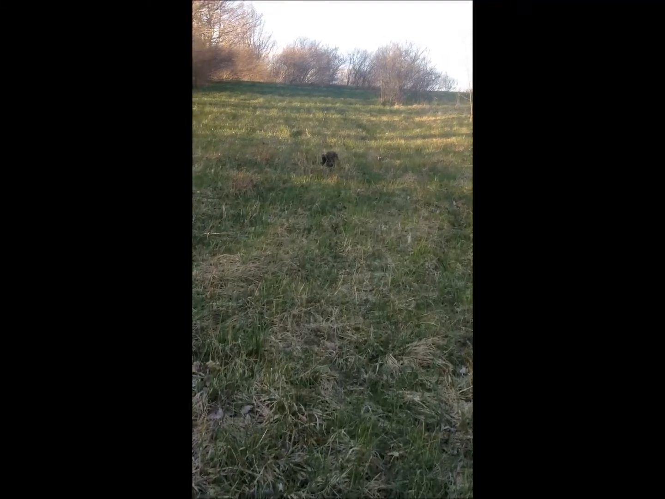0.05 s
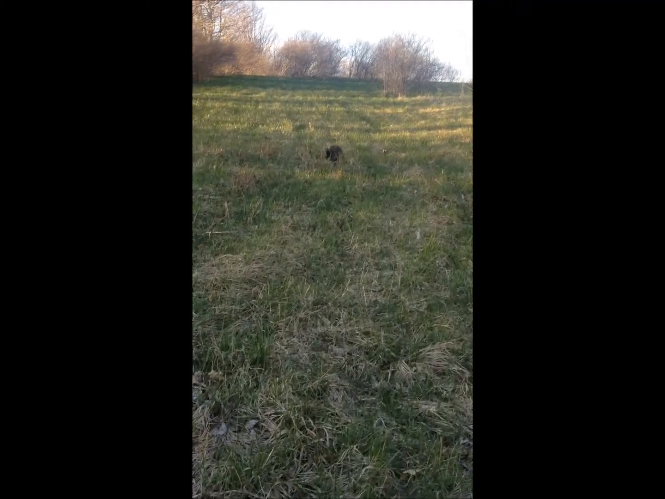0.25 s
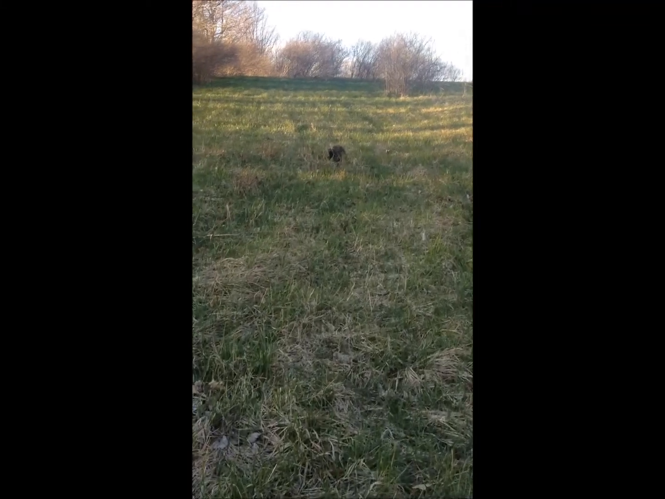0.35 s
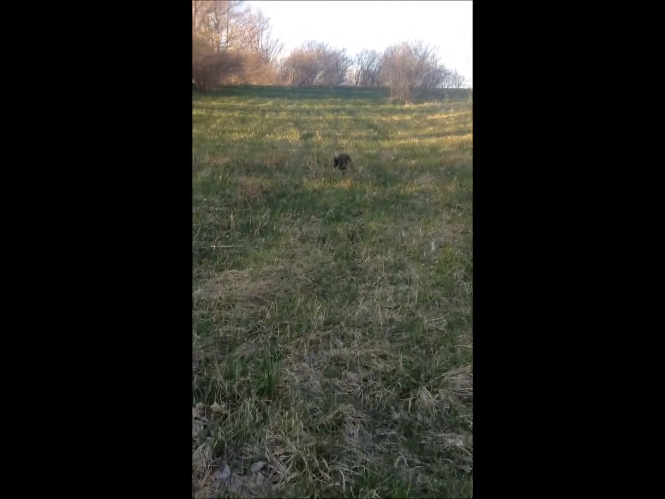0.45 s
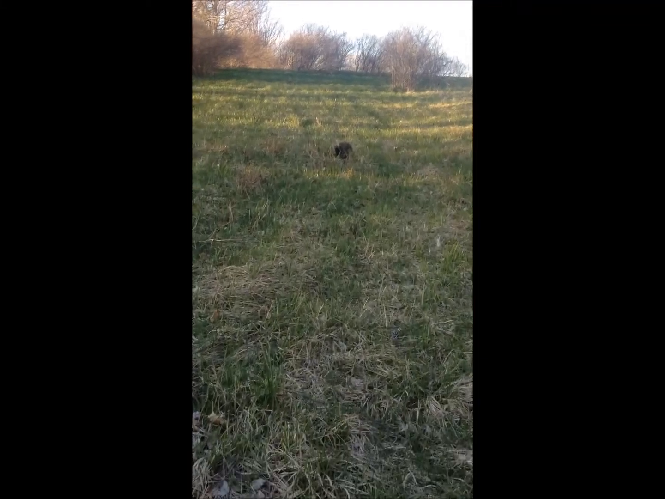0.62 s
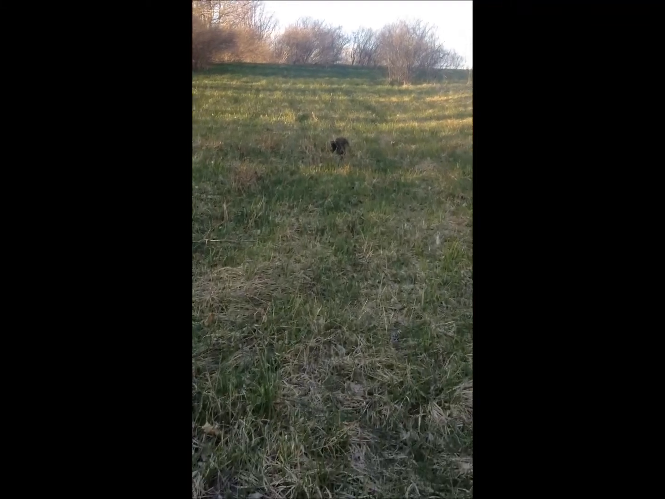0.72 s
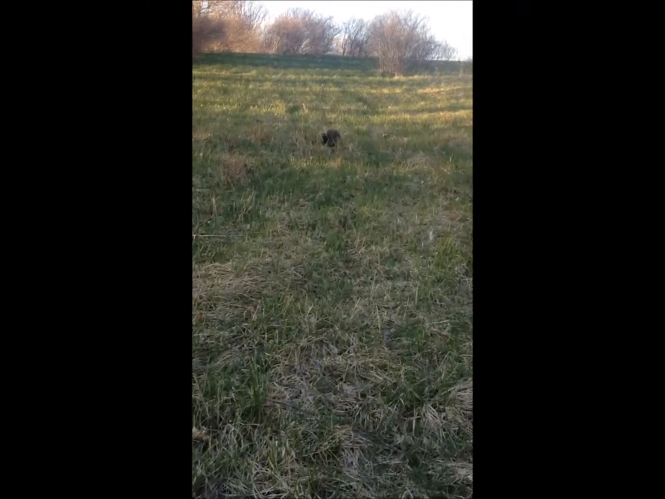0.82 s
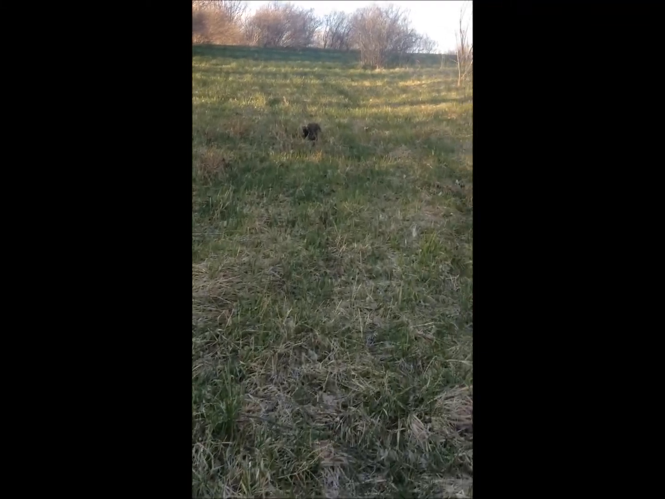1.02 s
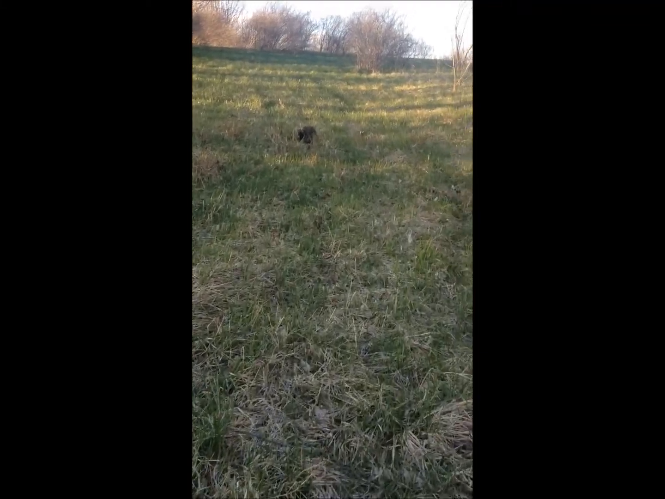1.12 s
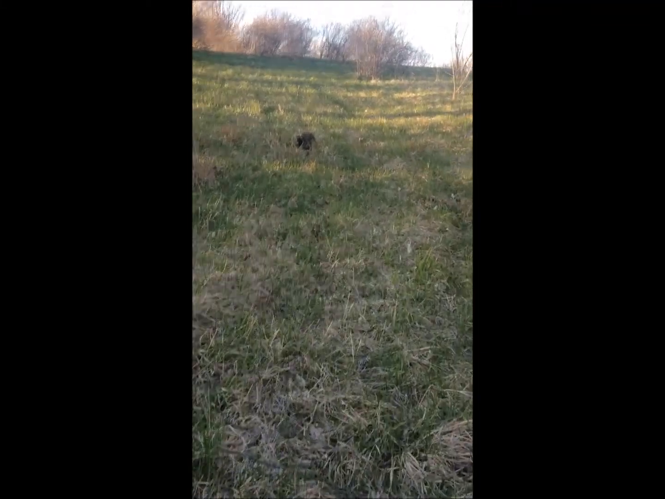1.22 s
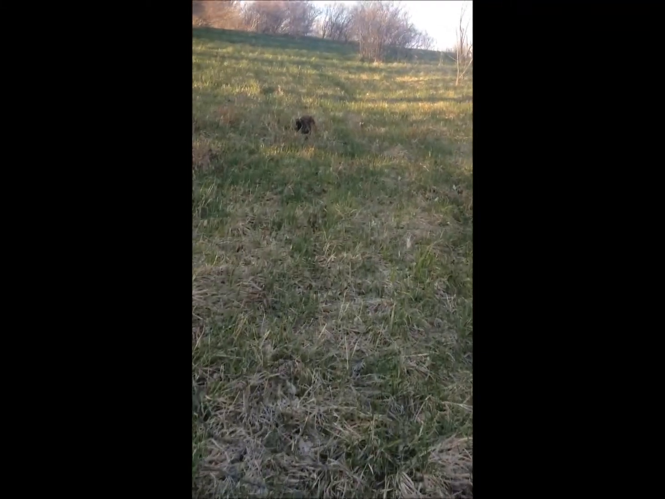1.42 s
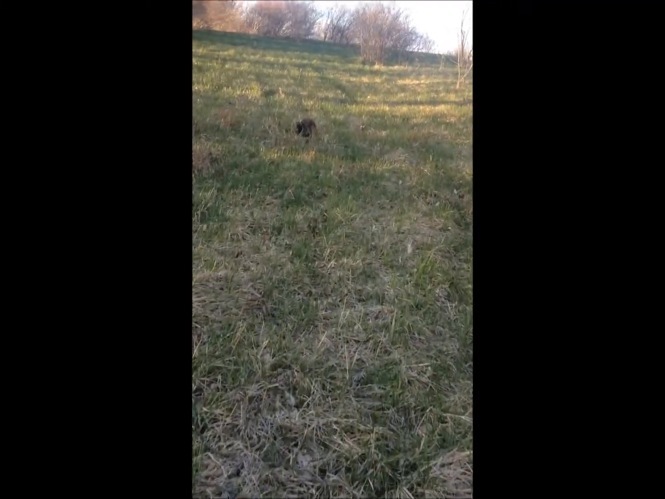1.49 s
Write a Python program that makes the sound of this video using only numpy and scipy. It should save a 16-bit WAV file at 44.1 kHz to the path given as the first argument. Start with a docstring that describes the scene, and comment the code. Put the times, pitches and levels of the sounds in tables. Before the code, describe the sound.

Dry meadow grass rustling and crunching close by under two footsteps, with stalks snapping, outdoors

```python
"""Dry, matted meadow grass rustles close by under two footsteps, in the open air.
Swish, crackle and low crunch are dense runs of tiny random clicks, with small straws and splinters popping.
Single stalks snap, each a short burst of breaking fibres with a thump, a knock, a crack and a tick.
The shoe bumps softly on the turf as short, dull thuds.
A faint, even outdoor hiss of filtered noise lies behind it all."""
import sys
import numpy as np
from scipy import signal
from scipy.fft import rfft, irfft, next_fast_len
from scipy.io import wavfile
from scipy.ndimage import uniform_filter1d

SR = 44100
rng = np.random.default_rng(int(sys.argv[2]) if len(sys.argv) > 2 else 0)


def file_out(sig):
    """Save sig as 16-bit WAV at sys.argv[1]."""
    # one column per channel
    cols = np.atleast_2d(sig).T
    # limit, then scale
    lim = np.clip(cols, -1, 1)
    pcm = np.round(lim * 32767).astype(np.int16)
    wavfile.write(sys.argv[1], SR, pcm)


N = 68355  # length in samples

# Tone of the open-air hiss: pitch_hz, strength_db
AIR_TONE = [(15, -44), (25, -57), (79, -27.5), (176, 10), (373, -1), (729, 0.5), (1060, -4.5), (2500, -2.5),
            (3540, -10), (7680, -12), (15000, -34)]
# Soft bumps of the shoe on the turf: start_s, pitch_hz, level_db, ring_s
SHOE_BUMPS = [(.096, 302, -52, .0025), (0.609, 240, -51.5, .0018), (1.0428, 197, -38, 0.002),
              (1.059, 420, -38, 0.0025), (1.0742, 305, -39, 0.0016), (1.085, 300, -39.5, 0.0018),
              (1.1002, 287, -40.5, 0.00055), (1.108, 310, -47.5, 0.0015), (1.18, 227, -46.5, 0.0032),
              (1.32, 355, -48, 0.00079), (1.327, 168, -52, 0.0059), (1.506, 317, -47.5, 0.0012)]
# Snapping stalks: start_s, fracture_ms, knock_pitch_hz, crack_pitch_hz,
# thump_level_db, knock_level_db, crack_level_db, tick_level_db
STALK_SNAPS = [(0.048, 0.33, 1510, 3360, -86, -50, -68, -52), (0.072, 0.3, 1420, 2640, -77, -62, -52, -54),
               (0.0924, 1.9, 1730, 3000, -50.5, -50, -52, -49),
               (0.1979, 0.4, 1570, 2150, -57, -54, -45.5, -69),
               (0.224, 1.4, 1210, 3570, -63, -72, -44.5, -55),
               (0.3291, 4.6, 1390, 2790, -46, -41, -38.5, -39.5),
               (0.337, 2.5, 1520, 3240, -73, -40, -42, -50),
               (0.3463, 2.2, 1420, 2280, -48, -45, -52, -46.5), (0.362, 1, 2060, 2280, -54, -47, -49, -60),
               (0.3705, 0.3, 560, 1660, -58, -37, -45, -65), (0.3977, 0.92, 1470, 2200, -69, -41, -63, -62),
               (0.403, 1.3, 1160, 1800, -42, -38, -44, -64), (0.4333, 1.4, 1010, 3000, -65, -51, -38, -41),
               (0.4359, 2.3, 920, 3400, -43.5, -38, -33, -31),
               (0.4799, 1.04, 1180, 3000, -35.5, -34.5, -24, -34),
               (0.5541, 0.66, 900, 3050, -43.5, -35, -42, -52),
               (0.5592, 1.2, 905, 2850, -52, -43.5, -51, -60),
               (0.607, 1.6, 1060, 3300, -50, -63, -64, -45.5),
               (0.693, 0.9, 970, 1980, -65, -46.5, -54, -50), (0.7002, 0.59, 790, 2700, -62, -47, -55, -64),
               (0.729, 0.39, 1200, 2500, -74, -50, -54.5, -53.5),
               (0.883, 0.21, 1170, 1200, -49, -44.5, -48.5, -68),
               (1.0296, 0.44, 870, 2340, -59, -46.5, -44.5, -39.5),
               (1.0356, 0.75, 860, 2560, -65, -40.5, -44.5, -53),
               (1.0492, 0.52, 1270, 3270, -62, -59, -44, -36.5),
               (1.0585, 4.1, 1420, 2140, -65, -37.5, -40, -34),
               (1.0606, 3.4, 980, 1540, -55, -32.5, -43, -54),
               (1.0772, 3.1, 1300, 2600, -61, -41, -41.5, -41),
               (1.096, 1.5, 1000, 3000, -63, -43, -43.5, -56),
               (1.1048, 1.6, 1300, 3000, -68, -47, -36, -33), (1.182, 1.1, 1090, 2700, -62, -50, -47, -60),
               (1.202, 0.4, 1300, 3260, -73, -47.5, -43, -51),
               (1.2324, 0.43, 1100, 2530, -75, -43, -48, -48),
               (1.242, 1.1, 1100, 2400, -79, -48.5, -56, -48),
               (1.2686, 0.1, 2000, 3730, -69, -51.5, -40, -43)]
# Resonances of a cracking stalk: pitch_ratio (times the crack pitch), strength_db
STALK_RESONANCES = [(.04, -62), (.45, -16), (.72, -12), (.85, -2), (1, 3), (1.2, -11), (1.45, 5),
                    (1.68, -8), (4.5, -36)]
# Rustle of the grass as it rises and falls, before flutter and pops:
# time_s, swish_level_db, crackle_level_db, crunch_level_db
RUSTLE_LEVELS = [(0, -52.5, -52.5, -58), (.06, -58.5, -61, -64), (.11, -61.5, -60.5, -56.5),
                 (0.15, -61.5, -67.5, -59), (0.205, -59.5, -47, -52.5), (.235, -56, -47.5, -48.5),
                 (.29, -56.5, -54.5, -50), (.335, -55, -45.5, -45), (.385, -62, -50.5, -45),
                 (.445, -53, -47, -53), (.47, -54.5, -54, -49), (.5, -52.5, -48.5, -58.5),
                 (.545, -46, -43, -50.5), (.58, -49.5, -49, -52), (.66, -52, -51.5, -57),
                 (.73, -54, -55, -53.5), (0.801, -56, -50.5, -60.5), (.835, -63.5, -63.5, -61),
                 (.875, -58, -56, -57), (.92, -63.5, -62.5, -57.5), (1.028, -59.5, -57, -58.5),
                 (1.03, -36.5, -47, -42), (1.055, -46, -53, -48.5), (1.068, -47, -45, -44),
                 (1.112, -41, -40, -43.5), (1.13, -51, -48, -54.5), (1.159, -45.5, -47, -60),
                 (1.188, -46.5, -43, -47.5), (1.215, -42.5, -44, -50), (1.25, -55.5, -51.5, -59),
                 (1.281, -49, -49.5, -58.5), (1.32, -55.5, -56.5, -54), (1.37, -49.5, -56.5, -53.5),
                 (1.42, -68, -58, -51.5), (1.455, -66.5, -62.5, -60.5), (1.55, -66, -63.5, -54.5)]
# Tone of the blades swishing past the shoe: pitch_hz, strength_db
SWISH_TONE = [(2500, -29), (4500, -16.5), (5800, -3.5), (7200, 3.5), (8300, 1), (9500, -3), (12000, -8),
              (15000, -5.5)]
# Tone of the crackle under the sole: pitch_hz, strength_db
CRACKLE_TONE = [(900, -25.5), (1800, 3.5), (2600, 4), (3100, 4.5), (3700, 3), (4400, 3), (5500, 2),
                (8000, -11.5)]
# Tone of the low crunch of the mat: pitch_hz, strength_db
CRUNCH_TONE = [(70, -30), (130, -9), (200, -1), (330, -0.5), (520, -1), (900, -2), (1500, -5.5),
               (2200, -13), (4000, -30)]

AIR_DB = -63.5
TOP_HZ = 15200  # the treble is cut above this

# Stalk snaps
BURST_SPAN_S = 0.0074  # levels of snaps and bumps are rms over this span
KNOCK_RING_S, CRACK_RING_S, TICK_RING_S = 0.00007, 0.00015, 0.00024  # added to the fracture time
THUMP_HZ, THUMP_RING_S = 332, 0.0012  # the mat under a snapping stalk
KNOCK_WIDTH = 1.45  # band edges as a ratio to the pitch
TICK_BAND_HZ = (5630, 9140)
TICK_TOP_DB, TICK_TOP_HZ = -6, 7700  # fine top of the tick: level against the tick, lower edge
SCATTER_DB, SCATTER_S = -18.5, 0.004  # neighbouring blades shaken by a snap
FIBRE_SPREAD_DB = 4.5
FIRST_BREAK_DB = -3.5  # the first break against the run of fibres
FIBRE_EVENNESS = 0.68  # 0-1: how evenly a break spreads its energy over pitch

# Rustle grains: clicks per second, spread of sizes in dB
SWISH_GRAINS, CRACKLE_GRAINS, CRUNCH_GRAINS = (9800, 3.4), (3000, 1.82), (1500, 2.2)
GRAIN_LIMIT = 4.43  # biggest grain, in spreads
# Pops: clicks per second, spread of sizes in dB, level in dB against the crackle or the swish
STRAW_POPS, STRAW_BAND_HZ = (190, 2.8, -6.5), (740, 2730)
SPLINTER_POPS, SPLINTER_BAND_HZ = (130, 3.2, -9.5), (3000, 7600)
FLUTTER_DB, FLUTTER_S = 2, 0.004  # rms swing of the gain, smoothing time


def undb(db):
    """Turn decibels into a plain gain."""
    return 10 ** (np.asarray(db) / 20)


def unit(x):
    """Scale to rms 1."""
    return x / np.sqrt(np.mean(x ** 2) + 1e-20)


def band(x, low_hz, high_hz, order=2):
    """Keep the pitches between two edges, using only past samples."""
    sos = signal.butter(order, [low_hz, high_hz], "band", fs=SR, output="sos")
    return signal.sosfilt(sos, x)


def colour(x, points):
    """Shape the tone through (Hz, dB) points, with no sound ahead of its cause."""
    hz, db = np.array(points).T
    size = next_fast_len(len(x))
    bins_hz = np.arange(size + 1) * SR / (2 * size)
    log_gain = np.log(undb(np.interp(np.log(bins_hz + 1), np.log(hz), db)))
    # folding the cepstrum forward gives a minimum-phase filter
    cepstrum = irfft(log_gain)
    cepstrum[1:size] *= 2
    cepstrum[size + 1:] = 0
    response = np.exp(rfft(cepstrum))
    return irfft(rfft(x, 2 * size) * response)[:len(x)]


def sizes(spread_db, count):
    """Grains of either sign: many small, a few large."""
    signs = rng.choice([-1, 1], count)
    spreads = np.minimum(rng.exponential(size=count), GRAIN_LIMIT)
    return signs * undb(spread_db * spreads)


def clicks(rate, spread_db):
    """Single-sample clicks at random moments."""
    happens = rng.random(N) < rate / SR
    return happens * sizes(spread_db, N)


def burst(x, db):
    """Give a short sound its level."""
    energy = np.sum(x ** 2) + 1e-20
    return x * undb(db) * np.sqrt(BURST_SPAN_S * SR / energy)


def add(out, x, start_s):
    """Mix a sound in at a time, cut off at the end of the scene."""
    i = int(start_s * SR)
    out[i:i + len(x)] += x[:N - i]


def air():
    """Faint, even hiss of the open field, made from filtered random noise."""
    hiss = colour(rng.standard_normal(N), AIR_TONE)
    return unit(hiss) * undb(AIR_DB)


def thud(hz, ring_s):
    """A rounded push into the soft mat: a wave that swells and quickly dies away."""
    t = np.arange(SR // 20) / SR
    push = t ** 2 * np.exp(-t / ring_s) * np.sin(2 * np.pi * hz * t)
    return np.gradient(push)


def bumps():
    """The shoe presses the turf: separate dull, damped thuds."""
    out = np.zeros(N)
    for start_s, hz, db, ring_s in SHOE_BUMPS:
        add(out, burst(thud(hz, ring_s), db), start_s)
    return out


def fracture(decay_s):
    """One sharp break, a quick dying run of fibres, and the shaken blades around it."""
    t = np.arange(SR // 10) / SR
    fading = np.exp(-t / decay_s) + undb(SCATTER_DB) * np.exp(-t / SCATTER_S)
    fibres = sizes(FIBRE_SPREAD_DB, len(t)) * fading
    first_break = (t == 0) * undb(FIRST_BREAK_DB) * np.linalg.norm(fibres)
    spectrum = rfft(fibres + first_break)
    # the strengths of the pitches are drawn closer together
    evened = spectrum / np.abs(spectrum) ** FIBRE_EVENNESS
    return irfft(evened)[:len(t) // 2]


def snaps():
    """A breaking stalk gives a thump in the mat, a woody knock, a dry crack and a bright tick."""
    out = np.zeros(N)
    for start_s, fracture_ms, knock_hz, crack_hz, thump_db, knock_db, crack_db, tick_db in STALK_SNAPS:
        fracture_s = fracture_ms / 1000
        knock_break = fracture(fracture_s + KNOCK_RING_S)
        crack_break = fracture(fracture_s + CRACK_RING_S)
        tick_break = fracture(fracture_s + TICK_RING_S)

        thump = thud(THUMP_HZ, THUMP_RING_S)
        knock = band(knock_break, knock_hz / KNOCK_WIDTH, knock_hz * KNOCK_WIDTH)
        crack = colour(crack_break, [(ratio * crack_hz, db) for ratio, db in STALK_RESONANCES])
        tick = band(tick_break, *TICK_BAND_HZ)
        tick_top = band(tick_break, TICK_TOP_HZ, TOP_HZ)

        add(out, burst(thump, thump_db), start_s)
        add(out, burst(knock, knock_db), start_s)
        add(out, burst(crack, crack_db), start_s)
        add(out, burst(tick, tick_db), start_s)
        add(out, burst(tick_top, tick_db + TICK_TOP_DB), start_s)
    return out


def grains(tone, rate, spread_db):
    """A dense run of tiny clicks from dry blades catching and slipping."""
    return unit(colour(clicks(rate, spread_db), tone))


def pops(edges_hz, rate, spread_db, db):
    """Sparse clicks of lone straws or splinters, kept within a band."""
    return unit(band(clicks(rate, spread_db), *edges_hz, order=1)) * undb(db)


def flutter():
    """Quick, uneven gain: blades catch and let go in little bunches."""
    size = int(FLUTTER_S * SR)
    smooth = uniform_filter1d(rng.standard_normal(N), size)
    smooth = uniform_filter1d(smooth, size)
    return undb(FLUTTER_DB * unit(smooth))


def rustle():
    """Blades swish and tick on the shoe, straws crackle and pop, and the mat crunches under each step."""
    times_s, *level_columns = np.array(RUSTLE_LEVELS).T
    now_s = np.arange(N) / SR
    swish_gain, crackle_gain, crunch_gain = (undb(np.interp(now_s, times_s, db)) for db in level_columns)

    straws = pops(STRAW_BAND_HZ, *STRAW_POPS)
    splinters = pops(SPLINTER_BAND_HZ, *SPLINTER_POPS)
    swish = swish_gain * (grains(SWISH_TONE, *SWISH_GRAINS) + splinters)
    crackle = crackle_gain * flutter() * (grains(CRACKLE_TONE, *CRACKLE_GRAINS) + straws)
    crunch = crunch_gain * flutter() * grains(CRUNCH_TONE, *CRUNCH_GRAINS)
    return swish + crackle + crunch


def scene():
    """Add all the sounds in one channel, with no echo."""
    mix = snaps() + bumps() + rustle() + air()
    return mix[None]


def record(dry):
    """A steep low-pass filter removes the highest treble."""
    sos = signal.ellip(10, .2, 70, TOP_HZ, fs=SR, output="sos")
    return signal.sosfilt(sos, dry)


dry = scene()
out = record(dry)
file_out(out)
```